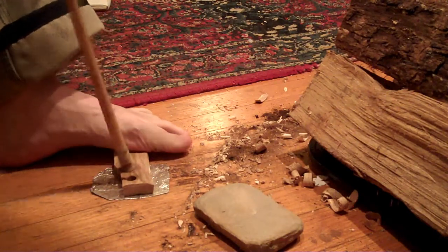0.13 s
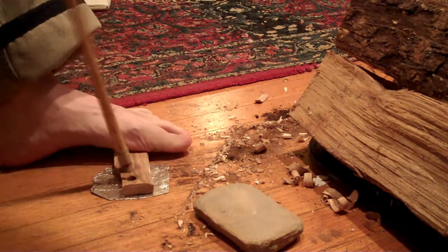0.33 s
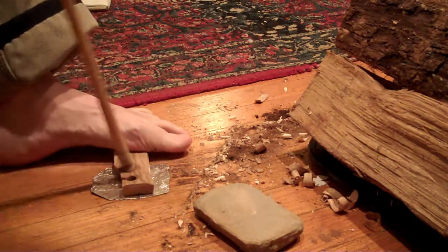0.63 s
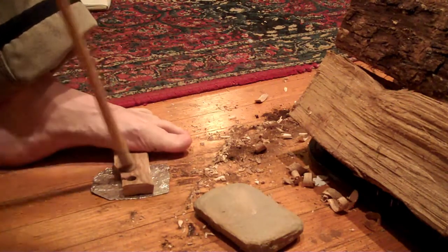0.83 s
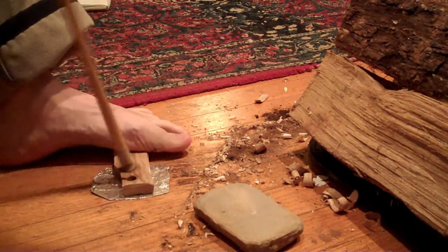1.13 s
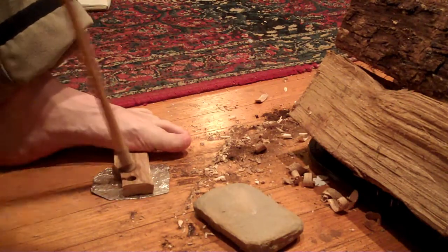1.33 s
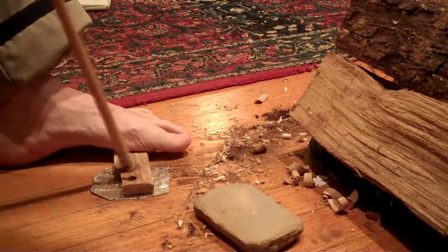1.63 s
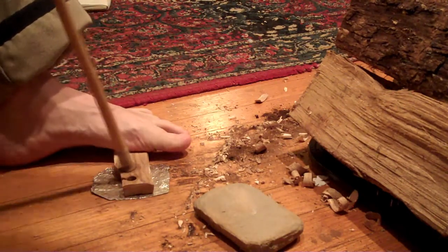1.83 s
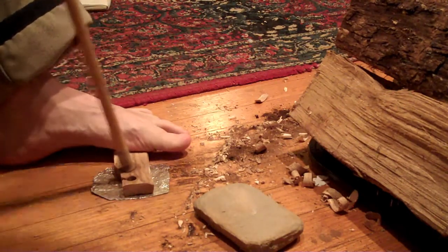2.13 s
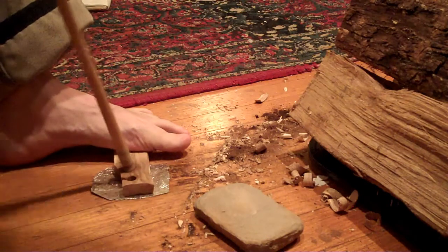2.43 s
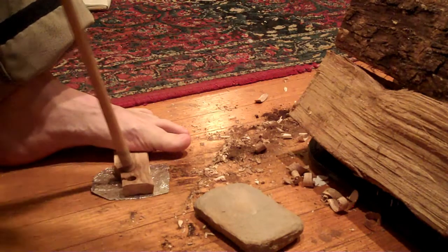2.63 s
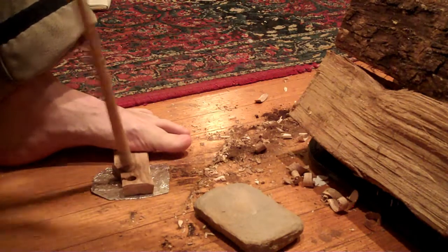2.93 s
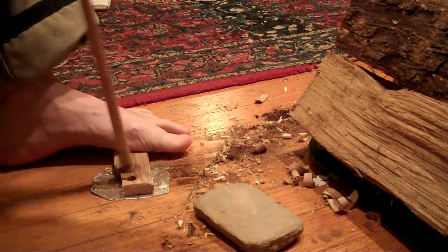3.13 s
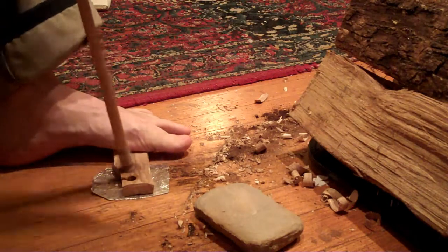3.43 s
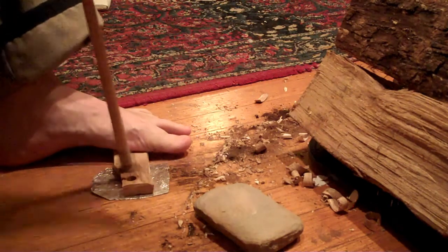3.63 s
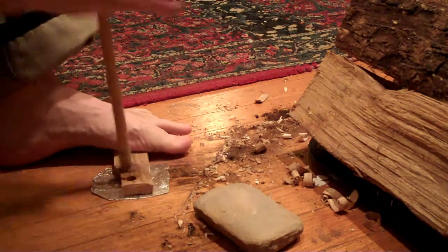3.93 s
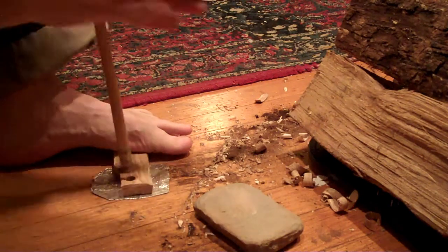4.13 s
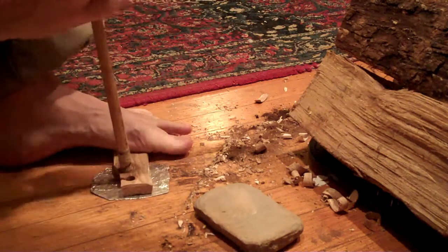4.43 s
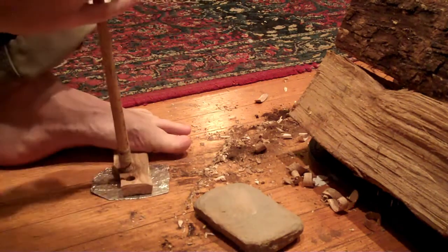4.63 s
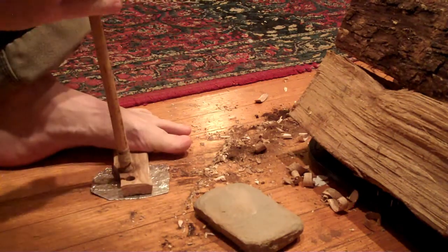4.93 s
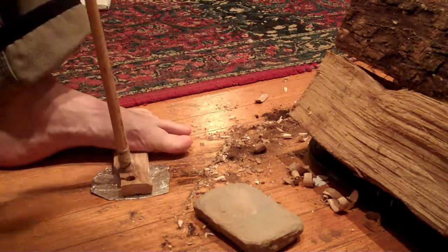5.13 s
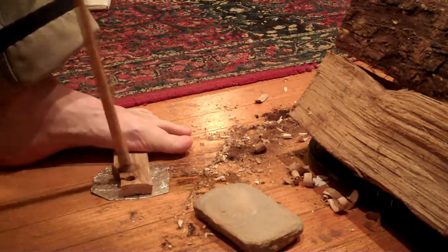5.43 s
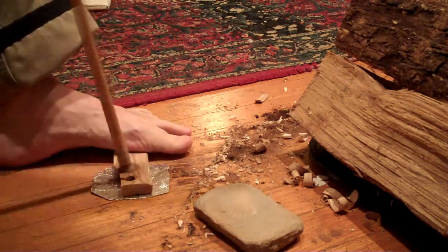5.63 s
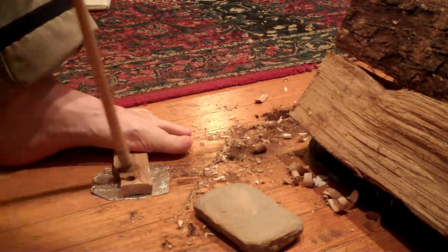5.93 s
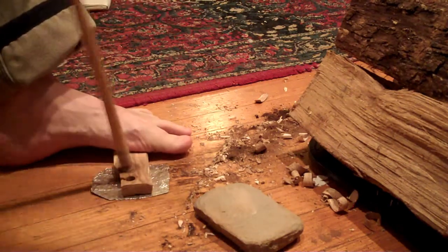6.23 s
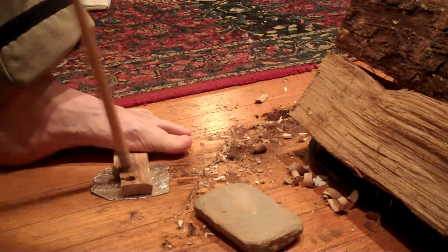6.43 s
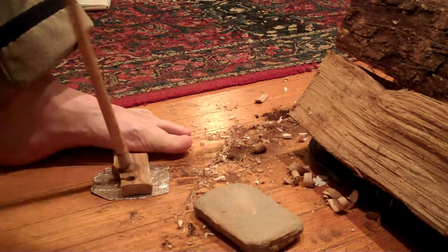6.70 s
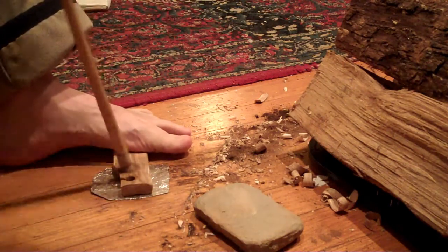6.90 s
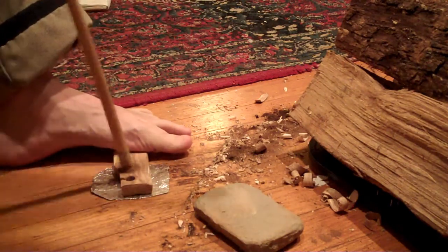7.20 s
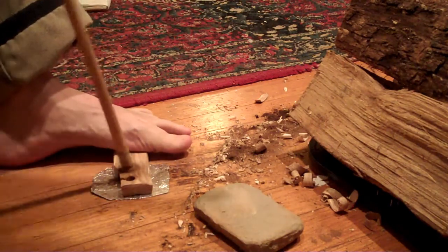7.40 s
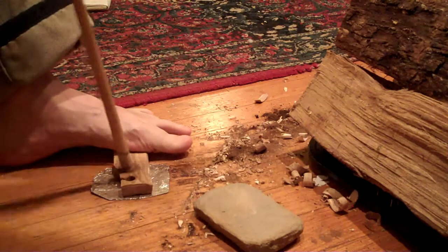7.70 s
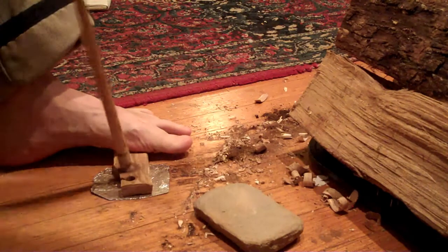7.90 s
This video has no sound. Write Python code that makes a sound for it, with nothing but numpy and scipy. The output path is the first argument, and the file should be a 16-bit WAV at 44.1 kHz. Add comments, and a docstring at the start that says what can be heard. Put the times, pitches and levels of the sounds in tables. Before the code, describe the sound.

A wooden spindle spun rapidly between palms grinds to and fro on a wooden board, chirping and squeaking, with one short pause before resuming.

```python
"""On a wooden floor, a wooden spindle is spun to and fro between two palms in the socket of a fireboard.
Strokes grind (filtered random snaps); the tip chirps (slip pulses), squeals or groans (harmonics).
Short noise ticks pass through the wood. The hands stop, slide up (skin-coloured noise) and spin on evenly.
Floorboard noise follows the effort, thumps are decaying sines; room noise and rumble lie beneath.
It is heard close, at two ports; the loudest peaks are squashed and clipped at full scale."""
import sys
import numpy as np
from scipy import signal
from scipy.fft import rfft, irfft, next_fast_len
from scipy.io import wavfile
from scipy.ndimage import uniform_filter1d

SR = 44100
rng = np.random.default_rng(int(sys.argv[2]) if len(sys.argv) > 2 else 0)


def materialize(psi):
    """Save the field psi as 16-bit PCM at rate SR to the path in sys.argv[1].

    A 1-D psi becomes a single channel; in a 2-D psi each row is a channel.
    """
    bounded = np.clip(np.atleast_2d(psi).T, -1, 1)
    quanta = np.round(bounded * 32767).astype(np.int16)
    wavfile.write(sys.argv[1], SR, quanta)


N = 355432

# Turns evenly spaced between rows; steps back once after the pause: [t/s, stroke position (rounded)]
BEAT = [(-0.056, 0), (1.478, 15), (4.179, 42), (4.29, 43), (5.32, 46.5), (5.442, 45), (5.745, 48),
        (6.301, 54), (7.193, 63), (7.507, 66), (8.108, 72)]
# Work of the hands: [t/s, full-speed level/dB, pressure on lower resonances/dB, lull at turns/dB]
EFFORT = [(0, -29.5, 1.5, -17), (0.38, -21.5, 2, -14.5), (0.58, -23.5, 0.5, -13), (0.76, -17, -1.5, -6),
          (1.0, -19, -1, -14), (1.2, -21.5, 1.5, -13), (1.7, -23.5, 3.5, -15), (1.86, -42, -4.5, 0),
          (2.1, -30, 2, -15), (2.52, -31, 2, -12), (2.72, -19, 1.5, -11), (3.1, -20, 1.5, -15),
          (3.6, -17, 1.5, -24), (4.06, -19.5, 4.5, -12), (4.23, -26.5, 6.5, -21), (4.32, -48, 12, -7.5),
          (5.29, -51.5, 2, -9), (5.34, -26.5, -0.5, -13.5), (5.43, -37, 1.5, -20),
          (5.49, -18.5, -0.5, -13.5), (5.8, -17.5, 1, -17), (6.4, -18.5, -0.5, -16.5), (7, -20, 4, -18),
          (8.06, -22.7, 5.5, -15)]
# Grinding tip colour: [f/Hz, density level/dB]
GRIND = [(300, -29.5), (700, -27), (1200, -21), (1500, -12.5), (2250, -12), (2700, -8.5), (3700, -9),
         (4900, -6.5), (5800, 0.5), (7600, -1.5), (8400, -7.5), (9600, -16.5), (11200, -17), (12500, -74)]
# Resonances of spindle and board: [f/Hz, width/Hz, level above colour/dB]
WOOD = [(910, 203, 7.5), (1380, 210, 3.5), (1854, 460, 3), (2800, 410, 2.5), (4690, 300, 1.5),
        (5960, 970, 2), (7570, 350, 1.5)]
# Stick-slip bursts at the tip: [t/s, length/s, level/dB, slip rate/Hz, favoured mode f/Hz]
CHIRPS = [(0.0448, 0.0085, -14.5, 1820, 5750), (0.0514, 0.0078, -12.5, 1460, 5940),
          (0.229, 0.0054, -16.5, 1450, 5860), (0.247, 0.0082, -8, 1454, 6500),
          (0.437, 0.0024, -8.5, 1485, 7200), (0.4512, 0.02, -8, 1500, 6300),
          (0.641, 0.0046, -4.5, 2224, 4550), (0.754, 0.0055, -13.5, 1486, 5500),
          (0.852, 0.0053, -8.5, 1632, 5700), (0.9557, 0.0046, -9, 1853, 5600),
          (1.051, 0.0053, -5.5, 1482, 6060), (1.0707, 0.0091, -14, 1410, 5800),
          (1.1574, 0.0068, -2, 1827, 7450), (1.2773, 0.0051, -12.5, 1230, 6050),
          (1.3643, 0.0071, -2.5, 1783, 7220), (1.484, 0.007, -15, 2044, 5500),
          (1.567, 0.0086, -2, 1903, 5720), (1.67, 0.0058, -10, 1704, 5090), (1.692, 0.004, -15, 2050, 5700),
          (1.7725, 0.0052, -2, 1865, 7400), (1.797, 0.0069, -12.5, 1786, 7440),
          (1.892, 0.007, -14, 1600, 6400), (1.973, 0.0055, -12, 1822, 7330),
          (2.1711, 0.0059, -5.5, 1778, 7200), (2.292, 0.0027, -15.5, 1066, 8240),
          (2.373, 0.0057, -7, 1762, 6830), (2.47, 0.0066, -12.5, 1803, 6900),
          (2.496, 0.0089, -13.5, 986, 6800), (2.77, 0.0077, -16.5, 1130, 5740),
          (2.8645, 0.0041, -1.5, 860, 4320), (2.8865, 0.0039, -14, 1720, 6950),
          (3.0602, 0.0052, -8, 1514, 4300), (3.081, 0.0042, -10, 1070, 7400),
          (3.427, 0.0032, -11.5, 1220, 6000), (3.653, 0.0069, -18, 930, 6200),
          (3.85, 0.0069, -12, 947, 1960), (5.447, 0.0043, -18, 1565, 6400),
          (6.724, 0.006, -10.5, 1460, 5550)]
# Colour of a whole-tip slip: [f/Hz, density level/dB]
SLIP = [(60, -41), (250, -25), (600, -40), (1000, -27), (1600, -15), (3000, -8.5), (4500, -2.5), (5800, 2),
        (7500, 1.5), (8600, -5), (10000, -12), (12000, -18)]
# Sustained stick-slip: [t/s, length/s, level/dB, pitch f/Hz, each harmonic over the one below/dB]
SQUEALS = [(1.49, 0.074, -31.5, 2000, -6.5), (1.693, 0.068, -20, 1977, -16.5),
           (1.79, 0.03, -13.5, 1892, 0.5), (1.89, 0.059, -15, 1930, 0), (2.916, 0.042, -41, 1000, -8),
           (3.01, 0.045, -24, 988, -4), (3.194, 0.053, -26.5, 979, -2.5), (3.324, 0.047, -36.5, 1013, -7.5),
           (3.41, 0.035, -28, 1010, -14), (3.522, 0.034, -20, 978, -1.5), (3.594, 0.085, -27, 1031, -4.5),
           (3.711, 0.05, -28, 1026, -2), (3.846, 0.024, -24, 987, -0.5), (4.035, 0.039, -27, 1930, -20),
           (7.033, 0.055, -28.5, 1964, -20), (7.634, 0.046, -32, 1944, -14)]
# Colour of squeals and groans: [f/Hz, level/dB]
SQUEAL_COLOUR = [(950, -9.5), (1900, -5.5), (2900, -3.5), (3800, -11), (5700, -3.5), (7600, 3),
                 (9500, -18.5), (12000, -32.5)]
# Short ticks through the wood, small tip grips and palms regripping: [t/s, level before common gain/dB]
TICKS = [(.156, -29), (0.411, -15), (.559, -23), (.972, -22), (1.178, -21), (1.589, -12), (1.869, -20),
         (2.089, -22.5), (2.192, -21.5), (2.395, -20), (2.589, -25.5), (3.628, -14), (3.828, -13),
         (4.032, -13), (4.346, -33.5), (4.365, -30), (4.61, -30.5), (5.17, -40.5), (5.327, -28),
         (5.338, -23.5), (5.354, -24.5), (5.732, -15.5), (5.921, -19.5), (6.107, -13), (6.912, -15.5)]
# Palms sliding up the spindle: [t/s, level before common gain/dB]
SLIDE = [(4.28, -48), (4.39, -55), (4.45, -41.5), (4.63, -39), (4.78, -47.5), (5.0, -53.5), (5.31, -56)]
# Skin on wood: [f/Hz, density level/dB]
SKIN = [(240, -44), (400, -9.5), (773, -12), (954, -11), (1050, -5), (1260, -7), (1650, -13.5),
        (1790, -10.5), (6790, 3.5), (11400, -18), (14800, -52), (22000, -120)]
# Floorboards under the fireboard: [f/Hz, density level/dB]
BOARDS = [(20, -34), (45, -12), (80, -10.5), (115, -16), (165, -0.5), (210, -2.5), (262, 3), (335, -11),
          (388, -3), (450, -5.5), (700, -9.5), (1000, -14), (1500, -39)]
# Grips that thump the floor: [t/s, level/dB]
THUMPS = [(0.451, -37), (0.643, -45), (1.569, -27.5), (1.777, -38), (2.868, -32), (4.431, -42), (4.47, -47),
          (5.169, -44)]
# Still room air: [f/Hz, density level/dB]
ROOM = [(15, -51), (25, -10), (180, 4), (1290, -7.5), (1400, -12), (1510, -22), (1900, -14), (2390, -7),
        (6010, 1.5), (11400, -10), (14800, -41.5), (22000, -120)]
# Faint rumble, independent at each port: [f/Hz, density level/dB]
RUMBLE = [(15, -20), (50, 6), (150, -14.5), (600, -16), (2000, -18), (11000, -23)]
# Port differences in the treble: [f/Hz, likeness 0-1, left over right/dB, left lead/rad]
PORTS = [(6560, 0.8, 0, 0), (7370, 0.03, 8, 0.47), (7800, 0, 16.5, 1.1), (7900, 0.6, 10, 0.72),
         (9000, 1, 4, 0.36), (10300, 0.16, 7, 0)]

PAUSE_START_S, PAUSE_END_S = 4.29, 5.32
CREST_SHARE = 0.47  # place of full speed within a stroke
PUSH_DB, STROKE_SCATTER_DB = 0.4, 0.5
HALO_DB, HALO_DECAY_S = -18, 0.011  # level relative to the chirp
# slips are even at the bending mode, uneven away from it (unevenness 0-1)
LOCK_HZ, LOCKED_UNEVEN, UNEVEN_PER_OCTAVE = 1857, 0.0269, 0.11
SQUEAL_UNEVEN, GROAN_UNEVEN = 0.011, 0.0237
SQUEAL_ARCH, SQUEAL_SAG = 0.036, 0.016  # shares of the pitch
# board level at half speed when effort is WORKING_DB; slope in dB per dB of effort
BOARDS_DB, WORKING_DB, BOARDS_FOLLOW = -48, -18, 0.43
ROOM_DB, RUMBLE_DB = -57, -69
EDGE_HZ = 11600


def amp(db):
    """Decibels to gain."""
    return 10 ** (np.asarray(db) / 20)


def unit(x):
    """Scales to rms 1."""
    return x / np.sqrt(np.mean(x ** 2) + 1e-20)


def read(points, hz, axis=1):
    """One column of a spectrum table, on a log-frequency axis."""
    table = np.array(points)
    return np.interp(np.log(hz + 1), np.log(table[:, 0] + 1), table[:, axis])


def curve(points, axis=1):
    """One column of a time table, at every sample."""
    table = np.array(points)
    return np.interp(np.arange(N) / SR, table[:, 0], table[:, axis])


def add(mix, s, sound):
    """Mixes a sound in at time s."""
    part = mix[max(round(s * SR), 0):][:len(sound)]
    part += sound[:len(part)]


def wander(size, hz):
    """Slow random signal of rms 1, rolling off above about hz."""
    f = np.fft.rfftfreq(size, 1 / SR)
    return unit(irfft(rfft(rng.standard_normal(size)) / (1 + (f / hz) ** 2), size))


def resonance_db(hz, centre_hz, width_hz, db):
    """Resonance peak over a colour."""
    return db / (1 + (2 * (hz - centre_hz) / width_hz) ** 2)


def wood_db(colour, hz):
    """A colour with the spindle and board resonances on it."""
    return read(colour, hz) + sum(resonance_db(hz, *mode) for mode in WOOD)


def ring(db_at, size=2048):
    """Causal minimum-phase impulse response, of energy 1, for a gain db_at(f/Hz)."""
    hz = abs(np.fft.fftfreq(size, 1 / SR))
    log_gain = np.log(amp(np.maximum(db_at(hz), -100)))
    response = np.fft.ifft(np.exp(np.conj(signal.hilbert(log_gain)))).real[:size // 2]
    return response / np.linalg.norm(response)


def through(x, response):
    """Convolves and keeps the length."""
    return signal.oaconvolve(x, response)[:len(x)]


def noise(colour):
    """Steady noise of rms 1 in a colour."""
    size = next_fast_len(N)
    gain = amp(read(colour, np.fft.rfftfreq(size, 1 / SR)))
    return unit(irfft(rfft(rng.standard_normal(size)) * gain, size)[:N])


def patchy(x, depth_db, width_bins, frames, size):
    """Drifting colour: random patches in time and frequency rise and sink."""
    overlap = size * 3 // 4
    z = signal.stft(x, nperseg=size, noverlap=overlap)[2]
    field = rng.standard_normal(z.shape)
    for _ in range(2):
        field = uniform_filter1d(field, width_bins, axis=0)
        field = uniform_filter1d(field, frames, axis=1)
    gain = unit(amp(depth_db * unit(field)))
    return signal.istft(z * gain, nperseg=size, noverlap=overlap)[1][:N]


def strokes(sharpness=2.48):
    """Speed 0-1, rubbing gain and pressure/dB: halts at turns, races between; pushes brighter than pulls."""
    t = np.arange(N) / SR
    turn_s, position = np.transpose(BEAT)
    place = np.interp(t, turn_s, np.round(position))
    k = place.astype(int)
    spinning = (t < PAUSE_START_S) | (t > PAUSE_END_S)
    skew = np.log(.5) / np.log(CREST_SHARE)
    speed = spinning * np.sin(np.pi * (place - k) ** skew)
    push_db = PUSH_DB * (-1.) ** k
    stroke_db = push_db + STROKE_SCATTER_DB * rng.standard_normal(N)[k]
    lull_power = amp(curve(EFFORT, axis=3)) ** 2 * (1 - speed ** 2)
    power = lull_power + amp(stroke_db) ** 2 * speed ** sharpness
    return speed, amp(curve(EFFORT)) * np.sqrt(power), curve(EFFORT, axis=2) - push_db


def chirp_halo():
    """Rubbing swells just before each chirp and fades just after."""
    out = np.zeros(N)
    t = np.arange(-2000, 2000) / SR
    for s, length_s, db, _, _ in CHIRPS:
        add(out, s + length_s / 2 + t[0], amp(db + HALO_DB) * np.exp(-abs(t) / HALO_DECAY_S))
    return out


def grinding(speed, gain, pressure_db, grains_per_s=5000, spread_db=1.0, dust=0.68,
             judder_db=1.5, judder_hz=110, body_hz=3600, speed_db=-2.5, shift_db=2.5):
    """Fibres snap and char dust crumbles under the tip, ringing the wood; the colour drifts at random."""
    sizes = amp(spread_db * np.minimum(rng.exponential(1, N), 5)) * rng.choice([-1, 1], N)
    snaps = unit(sizes * (rng.random(N) < grains_per_s / SR))
    judder = amp(judder_db * wander(N, judder_hz))
    drive = unit((snaps + dust * rng.standard_normal(N)) * judder)
    drive = patchy(drive, shift_db, width_bins=4, frames=10, size=1024)
    sound = through(drive * gain, ring(lambda hz: wood_db(GRIND, hz)))
    # pressure and slow turning strengthen the lower resonances
    body = signal.sosfiltfilt(signal.butter(2, body_hz, fs=SR, output="sos"), sound)
    body_db = pressure_db + speed_db * (speed - 1.05)
    return sound + body * (amp(body_db) - 1)


def slips(hz, uneven, size_spread=3.1):
    """Sharp releases of the tip at about rate hz, uneven in spacing and strength."""
    count = len(hz)
    turns = np.cumsum(hz * np.exp(1.5 * uneven * wander(count, 845))) / SR + .8
    whole = np.arange(1, int(turns[-1]) + 1)
    at = np.interp(whole, turns, np.arange(count))
    strength = np.exp(size_spread * uneven * rng.standard_normal(len(at)))
    offset = np.arange(count) - at[:, None]
    # windowed sincs place the pulses between samples
    return strength @ (np.sinc(offset) * np.exp(-(offset / 6) ** 2))


def chirps(scrape=0.4, taper=0.26, ring_db=7.5, ring_width_hz=520):
    """The tip grips and breaks free in a few hard slips, each burst favouring one spindle mode."""
    out = np.zeros(N)
    for s, length_s, db, hz, mode_hz in CHIRPS:
        uneven = LOCKED_UNEVEN + UNEVEN_PER_OCTAVE * abs(np.log2(hz / LOCK_HZ))
        count = round(length_s * SR)
        response = ring(lambda f: wood_db(SLIP, f) + resonance_db(f, mode_hz, ring_width_hz, ring_db))
        burst = unit(slips(np.full(count, hz), uneven)) + scrape * rng.standard_normal(count)
        burst = (burst - burst.mean()) * signal.windows.tukey(count, taper)
        burst = signal.fftconvolve(burst, response)
        # rms over the burst length, ring-out energy included
        add(out, s, amp(db) * burst * np.sqrt(count / np.sum(burst ** 2)))
    return out


def squeals(waver_hz=250, flutter=1.5, taper=0.56, ring_db=-18, ring_s=0.017, size=4000):
    """Slips lock to a spindle bending mode: a high squeal, or a rough groan an octave below."""
    out = np.zeros(N)
    t = np.arange(size) / SR
    for s, length_s, db, middle_hz, tilt_db in SQUEALS:
        count = round(length_s * SR)
        u = np.linspace(-1, 1, count)
        bite = min(amp(tilt_db), 1)
        # harder bite: more arch; softer bite: more sag
        pitch_hz = middle_hz * (1 - SQUEAL_ARCH * bite * u ** 2 - SQUEAL_SAG * (1 - bite) * u)
        uneven = np.interp(middle_hz, [LOCK_HZ / 2, LOCK_HZ], [GROAN_UNEVEN, SQUEAL_UNEVEN])
        # uneven grip: pitch wavers, level comes in knots
        waver = wander(count, waver_hz) + wander(count, 59)
        turns = np.cumsum(pitch_hz * (1 + uneven * waver)) / SR
        tone = np.zeros(count)
        for k in range(1, 7):
            harmonic_db = read(SQUEAL_COLOUR, k * middle_hz) + tilt_db * k + 2.9 * wander(count, 73)
            tone += amp(harmonic_db) * np.cos(2 * np.pi * (k * turns + rng.random()))
        grip = np.exp(16 * uneven * wander(count, 70))
        fluttering = np.exp(flutter * uneven * wander(count, waver_hz))
        swell = signal.windows.tukey(count, taper) * grip * fluttering
        add(out, s, amp(db) * unit(tone * swell))
        # the mode rings on as the tip lets go
        tail = t / ring_s * np.exp(1 - t / ring_s) * np.sin(2 * np.pi * pitch_hz[count * 3 // 4] * t)
        add(out, s + length_s / 2, amp(db + ring_db) * tail)
    return out


def ticks(gain_db=2, decay_s=0.0039, size=600):
    """Small grips of the tip and palms regripping: short decaying noise through the wood."""
    out = np.zeros(N)
    decay = np.exp(-np.arange(size) / SR / decay_s)
    for s, db in TICKS:
        add(out, s, amp(db + gain_db) * rng.standard_normal(size) * decay)
    return through(out, ring(lambda hz: wood_db(GRIND, hz)))


def sliding(gain_db=-1, grain_db=1.0):
    """Dry palms brush up the spindle: grainy skin-coloured noise."""
    s, db = np.transpose(SLIDE)
    gain = amp(np.interp(np.arange(N) / SR, s, db, left=-100, right=-100))
    return gain * noise(SKIN) * amp(gain_db + grain_db * wander(N, 120))


def floorboards(speed, speed_db=5, lumps_db=3.5, rattle_db=2.5, rattle_hz=30, thump_s=0.0046, size=2000):
    """The spindle shakes the floor unevenly through the board; the hardest grips thump it."""
    shake = patchy(noise(BOARDS), lumps_db, width_bins=2, frames=5, size=2048)
    shake = shake * unit(amp(rattle_db * wander(N, rattle_hz)))
    effort_db = BOARDS_FOLLOW * (curve(EFFORT) - WORKING_DB)
    out = shake * amp(BOARDS_DB + effort_db + speed_db * (speed - .5))
    t = np.arange(size) / SR
    modes = sum((-1) ** k * np.sin(2 * np.pi * hz * t) for k, hz in enumerate((110, 175, 265)))
    thump = np.exp(-t / thump_s) * modes
    for s, db in THUMPS:
        add(out, s, amp(db) * thump)
    return out


def reflections(x, t60_s=0.17, wet_db=-15, size=9000):
    """Weak, short reflections from floor, firewood and a carpeted room: sparse decaying taps."""
    t = np.arange(size) / SR
    sparse = (rng.random(size) < .06) * (t > .002)
    taps = rng.standard_normal(size) * sparse * amp(-60 * t / t60_s)
    return x + amp(wet_db) * through(x, taps / np.linalg.norm(taps))


def room_air():
    """Still room air: steady coloured noise."""
    return amp(ROOM_DB) * noise(ROOM)


def rumble():
    """Faint low noise, independent at each port."""
    return amp(RUMBLE_DB) * np.array([noise(RUMBLE), noise(RUMBLE)])


def ports(x, sway_hz=90, sway_radians=1.63):
    """Channels alike up to the treble, where level, lead and a randomly swaying phase part them."""
    count = next_fast_len(N)
    hz = np.fft.rfftfreq(count, 1 / SR)
    left = rfft(x, count)
    like = np.where(hz < PORTS[0][0], 1, np.clip(read(PORTS, hz, axis=1), 0, 1))
    lean = amp(read(PORTS, hz, axis=2))
    lead = read(PORTS, hz, axis=3)
    sway = np.exp(1j * sway_radians * wander(count, sway_hz))
    swept = rfft((signal.hilbert(x, count) * sway).real)
    right = (like * np.exp(-1j * lead) * left + np.sqrt(1 - like ** 2) * swept) / lean
    # hold the level of the two ports' average
    centre = np.sqrt(1 + 2 * like * np.cos(lead) / lean + lean ** -2) / 2
    return irfft(np.array([left, right]) / centre, count)[:, :N]


def scene():
    """All sounds of the drill in the room, at the two microphone ports."""
    speed, gain, pressure_db = strokes()
    drill = grinding(speed, np.hypot(gain, chirp_halo()), pressure_db)
    drill += chirps() + squeals() + ticks() + sliding() + floorboards(speed)
    return ports(reflections(drill) + room_air()) + rumble()


def record(dry, low_cut_hz=55):
    """The loudest peaks are squashed; then low cut, band limit and clipping at full scale."""
    squashed = dry / (1 + (dry / .95) ** 6) ** (1 / 6)
    low_cut = signal.butter(2, low_cut_hz, "high", fs=SR, output="sos")
    lean = signal.sosfilt(low_cut, squashed)
    band_limit = signal.firwin(401, EDGE_HZ, window=("kaiser", 8), fs=SR)
    limited = signal.oaconvolve(lean, band_limit[None], "same")
    return np.clip(limited, -1, 1)


dry = scene()
out = record(dry)
materialize(out)
```